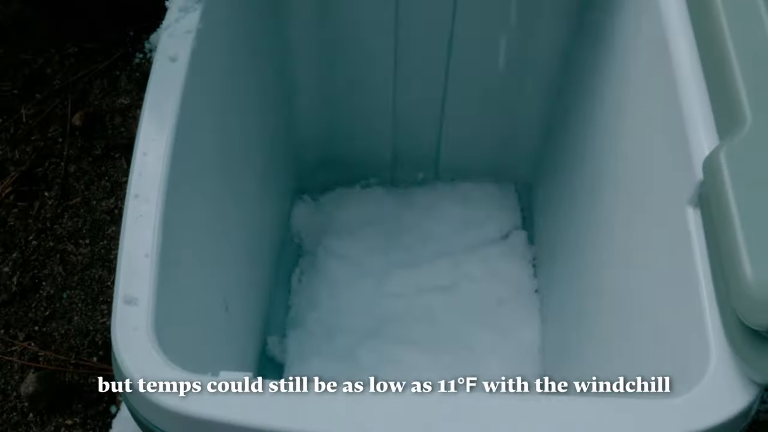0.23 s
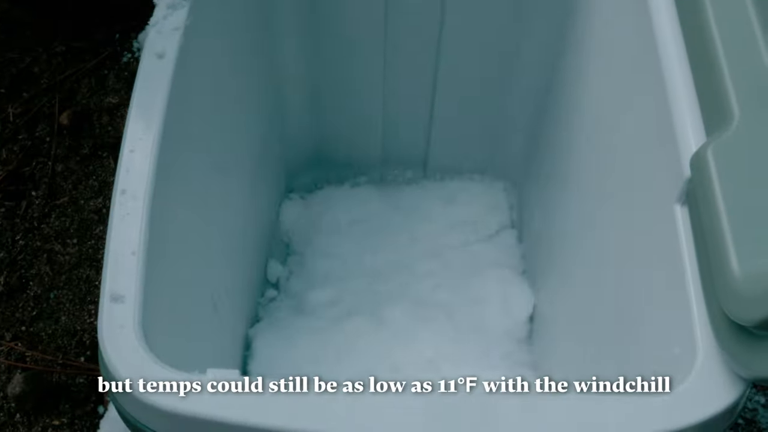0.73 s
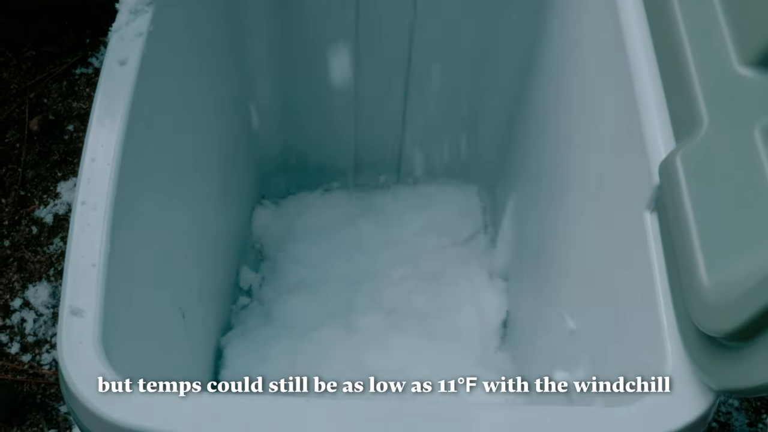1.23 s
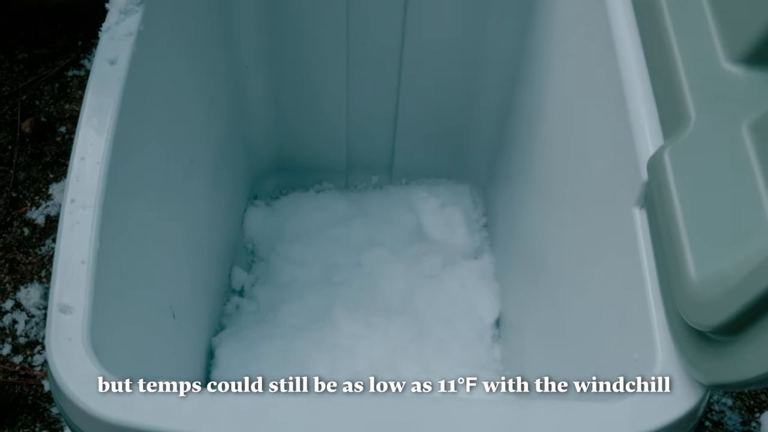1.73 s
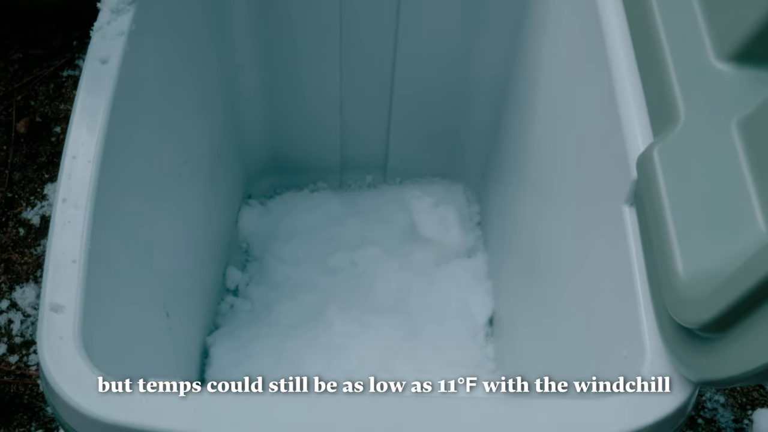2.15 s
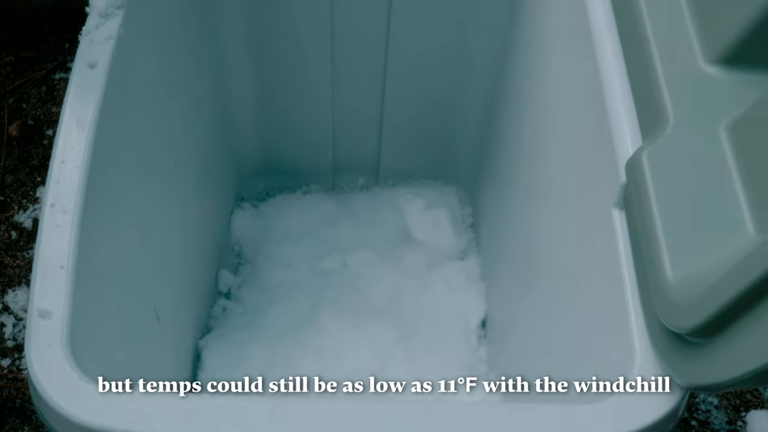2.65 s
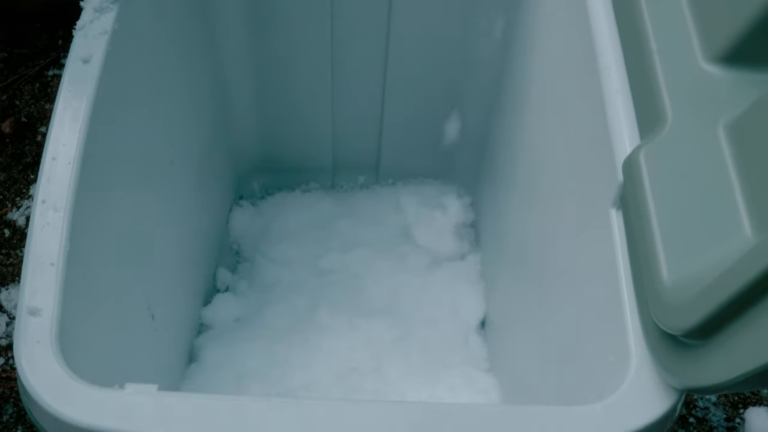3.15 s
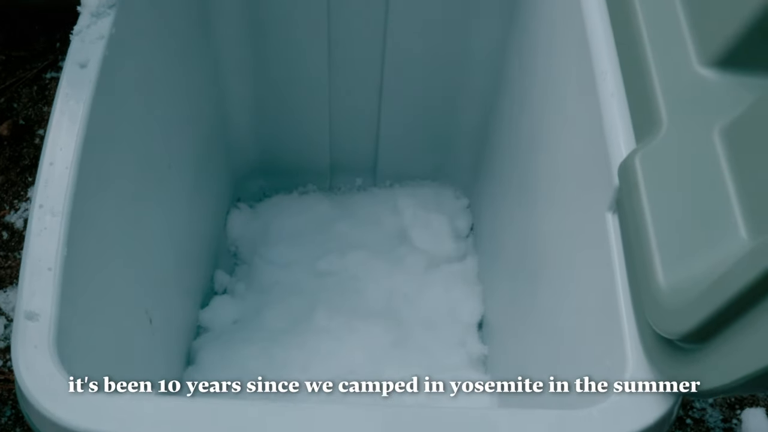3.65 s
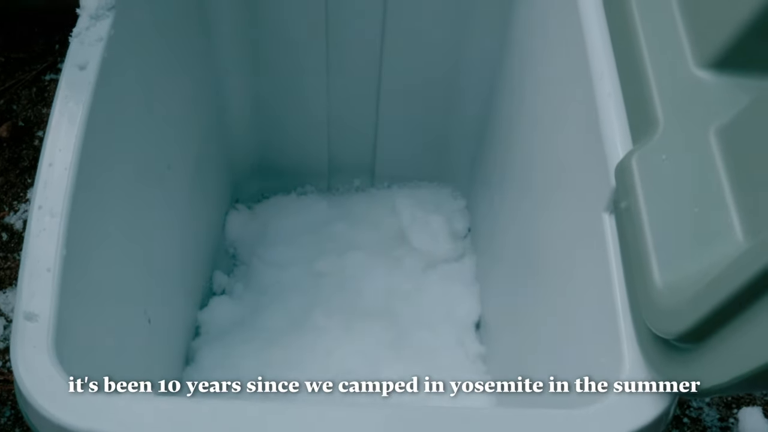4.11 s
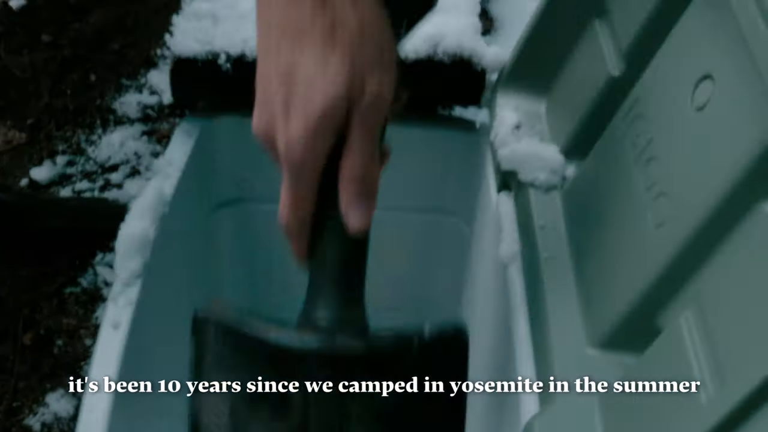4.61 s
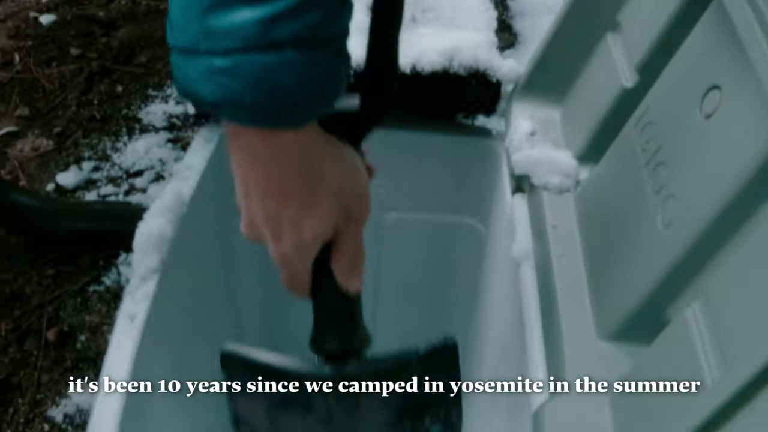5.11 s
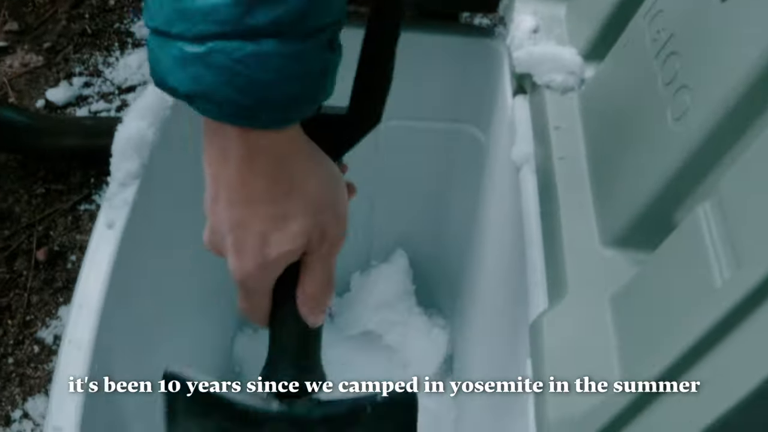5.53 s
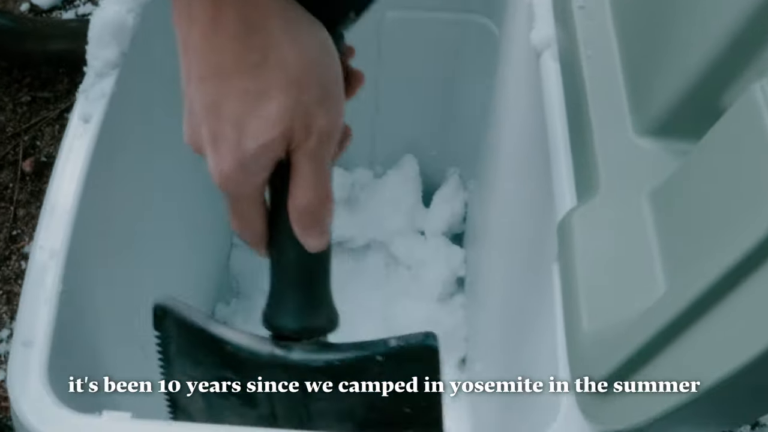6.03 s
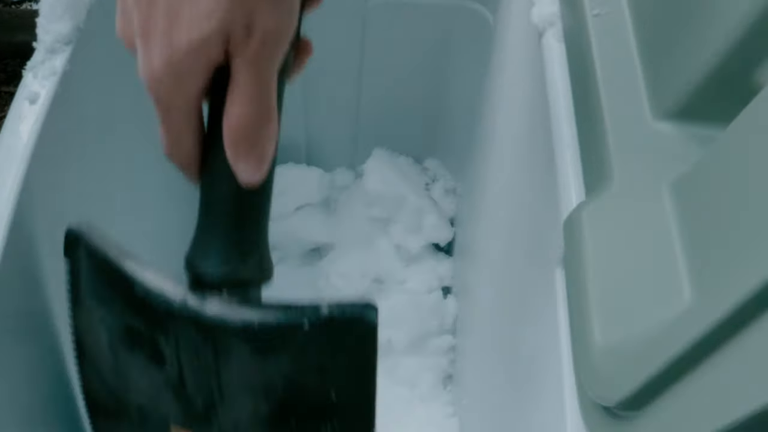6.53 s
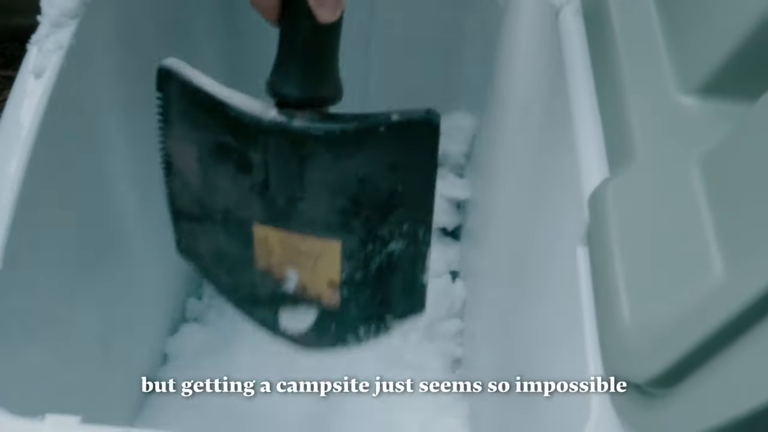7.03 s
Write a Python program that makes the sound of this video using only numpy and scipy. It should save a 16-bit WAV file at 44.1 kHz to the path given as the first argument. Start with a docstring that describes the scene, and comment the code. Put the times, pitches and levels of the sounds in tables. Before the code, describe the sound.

Close outdoor snow shoveling: gritty steel scrapes and crumb patter, followed by hollow plastic knocks, crunching chops and soft hissing slides in a cooler.

```python
"""Outdoors on icy snow, a plastic cooler close by, heard in stereo: a steel shovel scrapes in long strokes.
Stick-slip grains and catches drive the blade's resonances; each push builds up, holds and lets go.
Lumps thud and crumbs patter in the cooler (filtered bursts, grains); the blade slides and chops in the heap
(hiss, cracks, ringing walls and tub). A jacket sleeve rustles over handling rumble and faint air."""
import sys
import numpy as np
from scipy import signal
from scipy.fft import rfft, irfft, next_fast_len
from scipy.io import wavfile
from scipy.ndimage import map_coordinates

SR = 44100
rng = np.random.default_rng(int(sys.argv[2]) if len(sys.argv) > 2 else 0)


def persist_wave(psi):
    """Save psi, clipped to +-1, as 16-bit WAV."""
    counts = np.round(np.clip(psi, -1, 1) * 32767).astype(np.int16)
    wavfile.write(sys.argv[1], SR, np.atleast_2d(counts).T)


N = 320607
TIME = np.arange(N) / SR
PADDED = next_fast_len(N + SR // 2, real=True)
FREQS = np.arange(PADDED // 2 + 1) * SR / PADDED

# All table levels are relative.
# pushes over the ground: start_s, end_s, attack_s, release_s, grate_db, crunch_db, swell_db_per_s
STROKES = [(0.066, 0.393, 0.36, 0.11, -20, -20.5, -1), (0.9, 1.17, 0.0043, 0.12, -22, -22, -51),
           (1.332, 1.337, 0.04, .04, -25.5, -33.5, -13), (1.382, 1.459, 0.039, 0.041, -22, -22, -40),
           (2.177, 2.613, 0.019, 0.025, -16.5, -21.5, 3.5), (2.697, 2.825, .15, 0.014, -17.5, -24.5, 24),
           (3.476, 3.556, 0.021, 0.14, -21.5, -26.5, 2), (3.656, 3.794, 0.16, 0.052, -19, -26.5, -48)]
# edge catches on ice and breaks free: time_s, level_db, t60_s
CATCHES = [(0.001, -10.5, 0.084), (0.052, -4.5, 0.095), (0.085, -1, 0.14), (0.145, -19, 0.081),
           (0.182, -1, 0.082), (0.226, -2, 0.023), (0.241, -5, 0.1), (0.273, 1, 0.037), (0.316, -2, 0.077),
           (0.372, -3.5, 0.02), (0.896, -5, 0.028), (1.045, -0.5, 0.046), (1.401, -5.5, 0.049),
           (2.185, -1.5, 0.18), (2.22, -5, .15), (2.252, -7, 0.031), (2.363, -5.5, 0.082),
           (2.445, -4, 0.068), (2.603, 0, 0.034), (2.624, 5, 0.025), (2.772, -6, 0.25), (2.833, -1, 0.028),
           (3.611, -0.5, 0.046), (3.821, -9, 0.019)]
# blade springs free and rings on: time_s, level_db
LIFTS = [(1.46, -9.5), (2.837, -37), (2.92, -16), (3.821, -8.5)]
# how the blade lies on the ground: time_s, body_db, bite_db (near the edge), ring_db
STANCE = [(.15, -1.5, -30, 5.5), (.38, -2.5, -20, -17), (1.1, -2.5, -35, -12), (1.45, -11, -23.5, -2.5),
          (2.25, -9.5, -4.5, -1.5), (2.79, -8.5, -3.5, 9), (2.86, -10.5, -1, -11.5),
          (3.65, -10, -11.5, 2.5)]
# steel blade, before damping: pitch_hz, width_hz, level_db
BLADE_MODES = [(473, 16, -16), (689, 61, -1.5), (932, 80, -6.5), (1445, 57, -1), (1500, 33, 1),
               (1875.4, 40, 9.5), (2167, 19, -2.5), (2292, 27, -0.5), (2500, 19.4, 3), (2720, 30, -6),
               (2760, 18, -6), (3130, 16, 1.5), (3410, 15, -12), (3960, 12, -0.5), (4300, 91, -13.5),
               (4645, 70, -8.5), (4860, 37, -10), (5440, 28, -3), (5740, 40, -3.5), (6350, 140, -12),
               (6885, 100, -6), (7600, 60, -12.5), (8160, 110, -7), (8520, 80, -9.5), (9400, 42, -15),
               (9570, 100, -17), (10170, 240, -10.5), (10900, 110, -23), (11350, 50, -16.5),
               (12100, 240, -17.5)]
# longest notes of the lifted blade: pitch_hz, width_hz, level_db
FREE_MODES = [(1543, 11, 0.5), (1839, 15, -10), (2513, 8, 6), (2530, 10, -9)]
# blade in and out of the soft heap: start_s, end_s, hiss_db, edge_db, swell_db_per_s
SLIDES = [(4.905, 4.99, -37, -57, -40), (5.062, 5.216, -37.5, -52, 14), (5.585, 5.765, -34.5, -47, -11),
          (5.873, 5.883, -31.5, -45, 250), (6.161, 6.298, -28, -27.5, 105), (6.496, 6.59, -38, -56, -51),
          (6.716, 6.87, -39, -52, -69), (6.879, 6.983, -33, -35, 78), (7.146, 7.19, -39, -39.5, -25)]
# blade knocks on the cooler or chops in it:
# time_s, thump_db, clack_db, crack_db, crack_t60_s, bright_hz, low_clank_db, high_clank_db
CHOPS = [(2.834, -21, -30, -14.5, 0.04, 5800, -30, -41), (3.822, -20, -29.5, -6, 0.08, 1960, -17, -34),
         (4.872, -29, -18, -14, 0.048, 3240, -32, -31), (5.201, -52, -38.5, -23, 0.062, 3980, -50, -49),
         (5.29, -50, -29, -24.5, 0.089, 5000, -53, -51), (5.407, -50, -24, -18, 0.058, 6000, -28, -40),
         (5.501, -3, -15.5, -13.5, 0.037, 6050, -37, -28), (5.882, -32, -25, -17, 0.06, 11900, -34, -39),
         (6.288, -5.5, -13.5, -17.5, 0.066, 13000, -37, -31),
         (6.337, -11.5, -22.5, -27, 0.22, 11600, -45, -42), (6.598, -1.5, -13, -9.5, 0.03, 6960, -21, -44),
         (6.654, -13, -23, -27, 0.067, 6200, -33, -26), (6.759, -15, -25, -25, .05, 3000, -52, -36),
         (7.081, -30, -28, -41, 0.03, 3500, -38, -39)]
# half-buried blade: pitch_hz, t60_s, level_db
CLANK_MODES = [(2243, 0.12, -1), (3257, 0.12, 0)]
# cooler tub: pitch_hz, t60_s, level_db
TUB_MODES = [(88, 0.22, -35), (134.2, 0.2, 4), (163.5, 0.27, -5.5), (185, 0.18, -5), (372, 0.035, -3),
             (421, 0.033, -22)]
# flat cooler walls, before snow damping: pitch_hz, width_hz, level_db
PANEL_MODES = [(385, 40, 1), (688, 17, -4), (842, 6.5, -26), (1210, 43, -12), (1310, 18, -4)]
# snow lands in the cooler: time_s, thud_db, splat_db
LUMPS = [(0.585, -25, -31), (0.612, -28, -47), (0.627, -46, -33), (0.687, -23, -31.5), (0.732, -46, -35),
         (1.248, -51, -29.5), (1.713, -34.5, -37.5), (2.847, -21.5, -19.5), (2.884, -30, -29.5),
         (3.049, -46, -31.5), (3.826, -22.5, -16.5), (4.359, -53, -41), (4.509, -38, -62),
         (4.752, -41, -45), (4.792, -35, -41), (4.828, -52, -42)]
# showers after the throws: thickest_s, level_db, release_s
CRUMBS = [(0.49, -40.5, 0.28), (0.62, -37.5, 0.54), (1.68, -39.5, 0.14), (1.77, -41.5, 0.17),
          (2.93, -36, 0.11), (3.07, -44, 0.39), (3.95, -42, 0.44), (4.37, -67, .1)]
# ice chips click: time_s, level_db, pitch_hz
CHIPS = [(0.471, -28, 3100), (0.627, -25.5, 2750), (0.683, -31, 3930), (1.239, -21.5, 3430),
         (1.273, -34, 4200), (1.536, -33.5, 4030), (2.066, -46, 5000), (2.113, -43, 1090),
         (3.052, -27.5, 3700), (4.366, -33, 2500), (4.417, -36, 1570), (4.446, -39, 2670),
         (4.673, -36, 2000), (4.743, -62, 2410), (5.388, -27.5, 2440), (5.842, -30, 1430),
         (7.04, -32, 3050), (7.09, -28.5, 2480)]
# sleeve moves: middle_s, half_length_s, level_db
SWISHES = [(2.063, .16, -47.5), (3.26, 0.028, -51.5), (4.28, 0.09, -45.5), (4.66, 0.21, -39.5),
           (4.978, 0.091, -36.5), (5.417, 0.12, -35), (5.705, 0.2, -48), (5.908, 0.076, -36.5),
           (6.15, 0.16, -46), (6.512, 0.11, -39.5), (6.8, 0.078, -40.5), (7.167, 0.32, -41.5)]
# handling rumble: time_s, level_db
HANDLING = [(0, -40.5), (0.85, -43), (1.5, -46.5), (2.1, -45), (3.3, -72), (4.2, -57), (4.65, -43),
            (5.4, -42.5), (6.5, -39), (7.27, -40)]

# spectrum of the grating edge: freq_hz, level_db
GRATING_SPECTRUM = [(30, -52.5), (120, -23), (330, -31), (410, -9), (800, -19.5), (1300, -22.5),
                    (2500, -12), (4000, -18.5), (8000, -16), (12200, -18), (14000, -33.5), (16000, -85.5)]
# spectrum of soft snow on the blade: freq_hz, level_db
SOFT_SNOW_SPECTRUM = [(100, -8), (400, -2), (950, -4.5), (1500, -2.5), (3000, 0), (5500, -2.5),
                      (9500, -3.5), (12500, -8), (15500, -43)]
# spectrum of cracking crust and ice: freq_hz, level_db
CRACK_SPECTRUM = [(300, -12), (1200, -3), (2400, -5), (3300, -4.5), (5000, -9), (9000, -6), (12000, -4),
                  (16000, -27)]
# spectrum of the struck wall: freq_hz, level_db
WALL_SPECTRUM = [(60, -25.5), (200, 5), (280, -3.5), (380, -0.5), (500, 1.5), (620, -15), (800, -1.5),
                 (1100, -24.5), (2000, -40), (8000, -34)]
# spectrum of dull thuds: freq_hz, level_db
THUD_SPECTRUM = [(30, -16), (70, -3.5), (130, -0.5), (200, -4.5), (280, -9.5), (600, -22), (3000, -67)]
# spectrum of crumbs: freq_hz, level_db
CRUMB_SPECTRUM = [(200, 0.5), (500, 2.5), (1000, -4.5), (3200, -2), (5500, -8), (11000, -5), (13500, -11),
                  (16000, -36.5)]
# spectrum of cloth: freq_hz, level_db
SLEEVE_SPECTRUM = [(100, -28.5), (400, 3.5), (900, -2), (1500, -6.5), (3000, -3), (5500, -12), (10500, -13),
                   (12500, -12.5), (15500, -54)]
# spectrum of outdoor air: freq_hz, level_db
AIR_SPECTRUM = [(15, -20.5), (25, -8.5), (113, 1.5), (198, -4.5), (340, -4.5), (433, -5.5), (702, -11),
                (944, -12), (1050, -7.5), (2840, -30), (6040, -29), (11200, -28), (15500, -45)]
# share of scattered sound: freq_hz, level_db
SCATTER = [(100, -32), (400, -24), (900, -20), (1600, -13), (3000, -5), (6000, -3), (13000, -2.5)]
# weight of the level difference between the ears: freq_hz, weight_db
SHADOW = [(100, -20), (380, -28), (700, -1.5), (1300, 10), (2400, 6), (4400, -3), (8000, -3), (14000, -23)]
# treble balance of the whole mix: freq_hz, gain_db
TREBLE_BALANCE = [(3000, -0.5), (8000, -1.2), (11000, 2), (13000, 2.6)]

EDGE_DB = 30  # climb of an attack, fall of a release
STICK_DB, STICK_S = 4, 0.079  # stall before a catch: largest dip, time of the build-up curve
SLIDE_ATTACK_S, SLIDE_RELEASE_S = 0.017, 0.045
SNOW_DAMPING_HZ = 34.2  # packed snow widens the wall resonances
CRUMB_ATTACK_S = 0.23
ECHO_MS, ECHO_SWING_MS, ECHO_SWINGS_PER_S = 0.883, 0.363, 2.4
NEW_PATCH_S = 1.9  # from here on the shovel works further to the right
CUTOFF_HZ = 15650


def scraping():
    """The edge stutters over icy ground and shakes the blade; crystals break in a fine spray."""
    grate, crunch = sum(
        np.outer(from_db([grate_db, crunch_db]), effort(start_s, end_s, attack_s, release_s, swell))
        for start_s, end_s, attack_s, release_s, grate_db, crunch_db, swell in STROKES)

    # the added constants keep some pressure between slips
    judder = rms_one(slips(per_s=36, spread_db=3.0, t60_s=0.056) + 1.87)
    stutter = slips(per_s=110, spread_db=2.5, t60_s=0.027)
    low, high = (signal.butter(1, 3800, kind, fs=SR, output="sos") for kind in ("low", "high"))
    coarse_grains = grains(per_s=7000, spread_db=2.5) * rms_one(stutter + 1.6)
    coarse = signal.sosfilt(low, coarse_grains) * judder
    fine_grains = grains(per_s=16000, spread_db=3.5) * rms_one(stutter + 2.8)
    fine = signal.sosfilt(high, fine_grains)

    jolts = bursts(*np.transpose(CATCHES), rise_s=0.00013)
    catches = from_db(3.5) * signal.sosfilt(low, jolts) + from_db(-9.5) * jolts
    rubbing = from_db(12.0) * grate * coarse + from_db(19) * crunch * fine
    force = stalling() * rubbing + catches

    body, bite, ring = gains(STANCE)
    pressed = body * resonate(force, hz=674, width_hz=236) + bite * resonate(force, hz=1378, width_hz=440)
    spring = from_db(8.5) * bursts(*np.transpose(LIFTS), t60_s=0.071, rise_s=0.0011)
    # the ground mutes the long notes; the lifted blade rings out
    free = sum(from_db(db) * (ring * resonate(force, hz, width_hz) + resonate(spring, hz, width_hz))
               for hz, width_hz, db in FREE_MODES)
    grating = colour(force, GRATING_SPECTRUM, keep_power=False)
    return blade(force, damping=0.99) + pressed + free + grating


def stalling():
    """The rubbing dips while the edge is held, up to the moment it breaks free."""
    held = sum(effort(time_s - .002, time_s - .002, STICK_S, .002) for time_s, _, _ in CATCHES)
    return from_db(-STICK_DB * np.minimum(held, 1))


def blade(force, damping):
    """Plate modes ring; damping scales widths, contact point shifts their shares, flexing bends pitch."""
    ring = 0
    for k, (hz, width_hz, db) in enumerate(BLADE_MODES):
        share = flutter(per_s=15, depth_db=4.0)
        ring = ring + (-1) ** k * from_db(db) * resonate(force * share, hz, width_hz * damping)
    flex_s = .0016 * (flutter(per_s=9, depth_db=3) - 1)
    read_at = (TIME - flex_s) * SR
    return np.array([map_coordinates(channel, [read_at], order=3, mode="nearest") for channel in ring])


def sliding():
    """Loose snow hisses and crumbles along the blade, ringing it faintly; edge crust wakes high notes."""
    rub, edge = sum(
        np.outer(from_db([hiss_db, edge_db]), effort(start_s, end_s, SLIDE_ATTACK_S, SLIDE_RELEASE_S, swell))
        for start_s, end_s, hiss_db, edge_db, swell in SLIDES)
    crystals = grains(per_s=14000, spread_db=1.5) * flutter(per_s=100, depth_db=2.0)
    hiss = colour(rub * crystals, SOFT_SNOW_SPECTRUM)
    crust = resonate(edge * crystals, hz=8000, width_hz=3000)
    grit = from_db(9) * clods(rub, per_s=2000, low_hz=1174, high_hz=4770, cycles=14)
    ringing = blade(from_db(1.5) * hiss + from_db(21) * crust, damping=0.57)
    return wall_echo(from_db(-1.15) * hiss + grit, db=-11) + ringing


def wall_echo(x, db):
    """A near-wall echo combs the sound; the bands glide as the blade moves to and fro."""
    swing_ms = ECHO_SWING_MS * np.sin(2 * np.pi * ECHO_SWINGS_PER_S * TIME)
    delay_s = (ECHO_MS + swing_ms) / 1000
    return x + from_db(db) * np.array([np.interp(TIME - delay_s, TIME, channel) for channel in x])


def chopping():
    """Blows crack the crust and clank the blade, knock the plastic walls and boom in the tub."""
    time_s, thump_db, clack_db, crack_db, crack_t60_s, bright_hz, *clank_dbs = np.transpose(CHOPS)

    # the thump comes 5 ms late; the tub is too small to radiate deep bass
    tub = strike(time_s + 0.00501, thump_db, TUB_MODES)
    boom = from_db(-6.5) * signal.sosfilt(signal.butter(2, 95, "high", fs=SR, output="sos"), tub)
    clank = sum(strike(time_s, levels_db, [mode]) for levels_db, mode in zip(clank_dbs, CLANK_MODES))

    knock = bursts(time_s, clack_db, t60_s=0.091, rise_s=0.0019)
    panels = sum((-1) ** k * from_db(db) * resonate(knock, hz, width_hz + SNOW_DAMPING_HZ)
                 for k, (hz, width_hz, db) in enumerate(PANEL_MODES))
    clack = colour(knock, WALL_SPECTRUM) + from_db(20) * panels

    # a blow cushioned by snow loses its treble: one lowpass per blow
    snap = bursts(time_s, crack_db, crack_t60_s, rise_s=.0003)
    pieces = np.split(snap, (time_s[1:] * SR).astype(int), axis=1)
    cushioned = []
    for hz, piece in zip(bright_hz, pieces):
        lowpass = signal.butter(2, min(hz, .45 * SR), fs=SR, output="sos")
        cushioned.append(signal.sosfilt(lowpass, piece + 1e-18))
    crack = from_db(2.5) * colour(np.hstack(cushioned), CRACK_SPECTRUM)

    centred = (boom + clank) * [[1], [0]]  # mid only
    return centred + clack + crack


def strike(times_s, levels_db, modes):
    """Impulses set decaying sine modes ringing."""
    push, age_s = np.zeros(N), TIME[:SR // 2]
    push[np.round(times_s * SR).astype(int)] = from_db(levels_db)
    ring = sum(from_db(db - 60 * age_s / t60_s) * np.sin(2 * np.pi * hz * age_s) for hz, t60_s, db in modes)
    return signal.fftconvolve(push, ring)[:N]


def falling_snow():
    """Soft lumps thud on the heap and make the tub hum; crumbs patter."""
    time_s, thud_db, splat_db = np.transpose(LUMPS)
    thud = colour(bursts(time_s, thud_db, t60_s=0.32, rise_s=0.0048), THUD_SPECTRUM)
    hum = resonate(thud, hz=173, width_hz=24)
    splat = colour(bursts(time_s, splat_db, t60_s=0.16, rise_s=0.00072), WALL_SPECTRUM)
    lumps = from_db(-6.0) * thud + from_db(1) * hum + from_db(-2.0) * splat

    shower = sum(from_db(db) * effort(thickest_s, thickest_s, CRUMB_ATTACK_S, release_s)
                 for thickest_s, db, release_s in CRUMBS)
    crumbs = shower * grains(per_s=3000, spread_db=2.8) * flutter(per_s=90, depth_db=2)
    patter = colour(crumbs, CRUMB_SPECTRUM)
    pellets = clods(shower, per_s=250, low_hz=507, high_hz=5000, cycles=14)
    return lumps + from_db(-1.5) * patter + from_db(3.5) * pellets


def ice_chips():
    """Hard chips give short bright clicks, each resonating at its own pitch."""
    time_s, click_db, pitch_hz = np.transpose(CHIPS)
    clicks = bursts(time_s, click_db, t60_s=0.088, rise_s=0.00037)
    out = from_db(-3.0) * colour(clicks, CRACK_SPECTRUM)
    for start, hz in zip((time_s * SR).astype(int), pitch_hz):
        span = slice(start, start + SR // 20)
        out[:, span] += from_db(9.5) * resonate(clicks[:, span], hz, width_hz=360)
    return out


def arm():
    """The jacket swishes (grains) and creases (slips) over a dull rumble of handling."""
    rustle = sum(from_db(db) * np.exp(-np.minimum(((TIME - middle_s) / half_s) ** 2, 20))
                 for middle_s, half_s, db in SWISHES)
    handling, = gains(HANDLING)
    fibres = rustle * grains(per_s=2700, spread_db=0.0) * flutter(per_s=47, depth_db=5)
    cloth = colour(fibres, SLEEVE_SPECTRUM)
    folds = rustle * slips(per_s=24, spread_db=0, t60_s=0.095) * rng.standard_normal((2, N))
    creases = resonate(folds, hz=1600, width_hz=750)
    rumble = colour(handling * rng.standard_normal((2, N)), THUD_SPECTRUM)
    return from_db(-1.5) * cloth + from_db(2) * creases + from_db(-1.5) * rumble


def air():
    """Faint outdoor background: steady coloured noise."""
    return from_db(-56.5) * colour(rng.standard_normal((2, N)), AIR_SPECTRUM)


def effort(start_s, end_s, attack_s, release_s, swell_db_per_s=0):
    """Gain of one movement: builds up, holds while swelling or sagging steadily, lets go."""
    held_db = swell_db_per_s * (np.clip(TIME, start_s, end_s) - (start_s + end_s) / 2)
    before = np.maximum(start_s - TIME, 0) / max(attack_s, .001)
    after = np.maximum(TIME - end_s, 0) / max(release_s, .001)
    return from_db(np.maximum(held_db - EDGE_DB * (before + after), -160))


def slips(per_s, spread_db, t60_s):
    """Stick-slip: pressure lets go at uneven moments, each jolt dying exponentially; unit power."""
    gaps, sizes = rng.uniform(.3, 1.7, N // 100), rng.standard_normal(N // 100)
    at = (np.cumsum(gaps) * SR / per_s).astype(int)
    inside = at < N
    jolts = np.zeros(N)
    jolts[at[inside]] = from_db(spread_db * np.clip(sizes[inside], -2, 2))
    return rms_one(signal.lfilter([1], [1, -from_db(-60 / (t60_s * SR))], jolts + 1e-12))


def grains(per_s, spread_db):
    """Random tiny fractures of uneven size, as mid and side; unit power."""
    born = rng.random(N) < per_s / SR
    sizes = from_db(spread_db * np.minimum(rng.exponential(1, N), 4))
    return rms_one(born * sizes * rng.choice([-1, 1], (2, N)))


def clods(amount, per_s, low_hz, high_hz, cycles):
    """Icy crumbs break one by one, each a short ring at one of 12 pitches."""
    breaks = amount * grains(per_s, spread_db=3.0)
    dealt = rng.integers(0, 12, N)
    return sum(resonate(breaks * (dealt == k), hz, hz / cycles)
               for k, hz in enumerate(np.geomspace(low_hz, high_hz, 12)))


def bursts(times_s, levels_db, t60_s, rise_s):
    """Mid and side noise that swells at each time and dies away."""
    envelope, age_s = np.zeros(N + SR), TIME[:SR // 2]
    for time_s, db, decay_s in zip(times_s, levels_db, np.broadcast_to(t60_s, len(times_s))):
        start = max(round(time_s * SR), 0)
        decay = from_db(db - 60 * age_s / max(decay_s, .005))
        envelope[start:start + len(age_s)] += decay * (1 - np.exp(-age_s / rise_s))
    return envelope[:N] * rng.standard_normal((2, N))


def flutter(per_s, depth_db):
    """Randomly wandering gain of about unit power."""
    knots = rms_one(from_db(depth_db * np.clip(rng.standard_normal(N // 100), -2, 2)))
    return np.interp(TIME * per_s, np.arange(len(knots)), knots)


def resonate(x, hz, width_hz):
    """One two-pole resonance, about unit gain at its peak."""
    r = np.exp(-np.pi * width_hz / SR)
    zeros = np.array([1, 0, -1]) * (1 - r * r) / 2
    poles = [1, -2 * r * np.cos(2 * np.pi * hz / SR), r * r]
    return signal.lfilter(zeros, poles, x + 1e-15)


def colour(x, points, keep_power=True):
    """Causal (minimum-phase) filter with the given spectrum, via the folded cepstrum."""
    gain = gain_by_hz(points)
    if keep_power:
        gain = rms_one(gain)
    cepstrum = irfft(np.log(gain), PADDED)[:PADDED // 2]
    cepstrum[1:] *= 2
    return irfft(rfft(x, PADDED) * np.exp(rfft(cepstrum, PADDED)), PADDED)[..., :N]


def gain_by_hz(points):
    """Spectrum table as gain at every FFT frequency."""
    hz, db = np.transpose(points)
    return from_db(np.interp(np.log(FREQS + 1), np.log(hz), db))


def gains(rows):
    """The dB columns of a time table as gain curves."""
    time_s, *columns_db = np.transpose(rows)
    return [from_db(np.interp(TIME, time_s, db)) for db in columns_db]


def rms_one(x):
    """Scale to unit power."""
    return x / np.sqrt(np.mean(np.abs(x) ** 2) + 1e-20)


def from_db(db):
    """Decibels to gain."""
    return 10 ** (np.asarray(db) / 20)


def place(mid_side, pan_db, lag_ms):
    """Left and right: direct sound reaches the left lag_ms later; scattered sound differs at each."""
    mid, side = rfft(mid_side, PADDED)
    ear = np.array([[1], [-1]])
    direct = mid * np.exp(-1j * np.pi * FREQS * lag_ms / 1000) ** ear  # half the lag per ear
    scattered = ear * side * gain_by_hz(SCATTER)
    shade = from_db(pan_db / 2 * gain_by_hz(SHADOW)) ** ear
    return irfft((direct + scattered) * shade, PADDED)[:, :N]


def scene():
    """Scraping and cooler sounds both lean to the right in level; their ear delays are opposite."""
    scrape, moved = scraping(), TIME > NEW_PATCH_S
    ground = place(scrape * ~moved, pan_db=-1.56, lag_ms=0.029)
    ground = ground + place(scrape * moved, pan_db=-2.0, lag_ms=0.023)
    cooler = sliding() + chopping() + falling_snow() + ice_chips() + arm() + air()
    return ground + place(cooler, pan_db=-1.5, lag_ms=-0.03)


def record(dry):
    """The top treble is lifted, peaks clip just under full scale, the highest band is cut."""
    clipped = np.clip(colour(dry, TREBLE_BALANCE, keep_power=False), -.92, .92)
    steep = signal.ellip(12, .1, 80, CUTOFF_HZ, fs=SR, output="sos")
    return signal.sosfilt(steep, clipped)


dry = scene()
out = record(dry)
persist_wave(out)
```